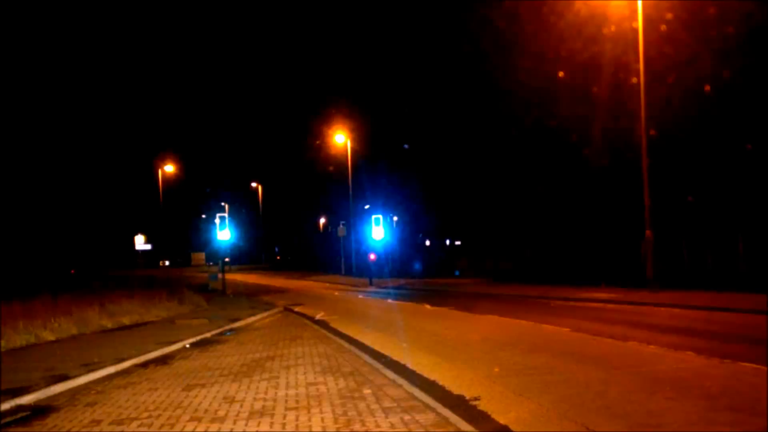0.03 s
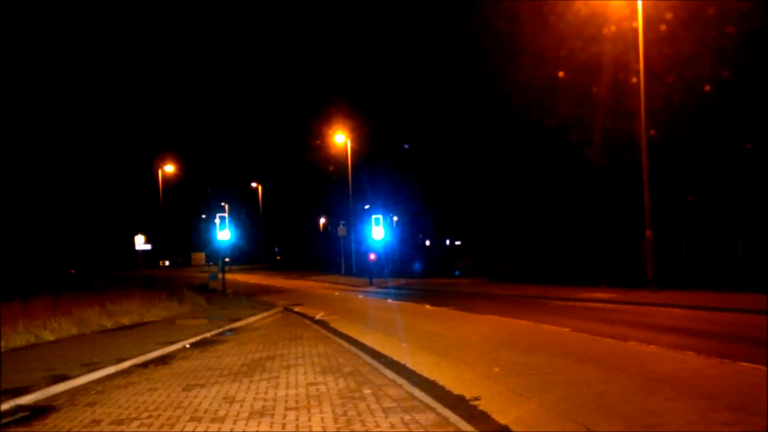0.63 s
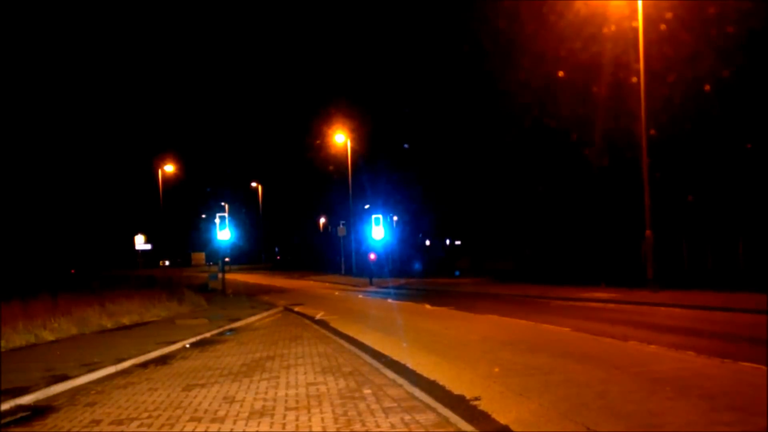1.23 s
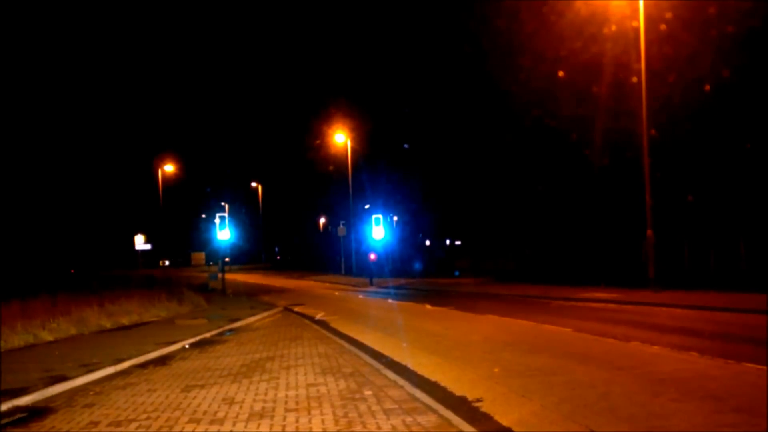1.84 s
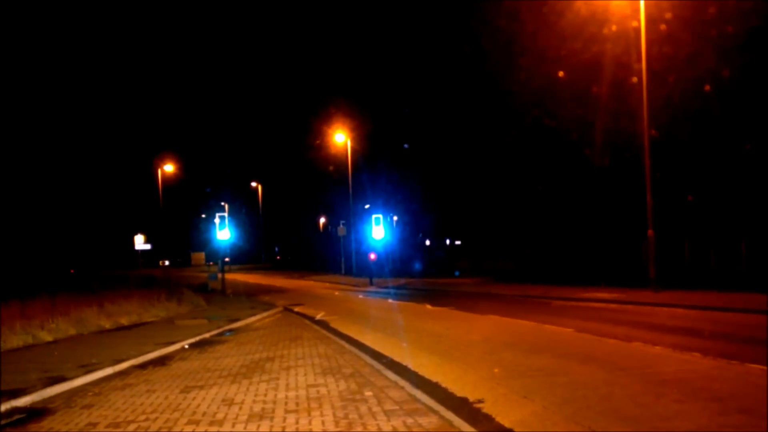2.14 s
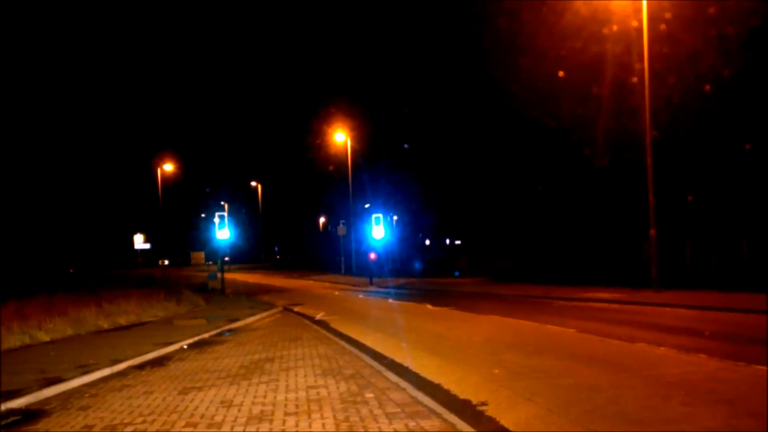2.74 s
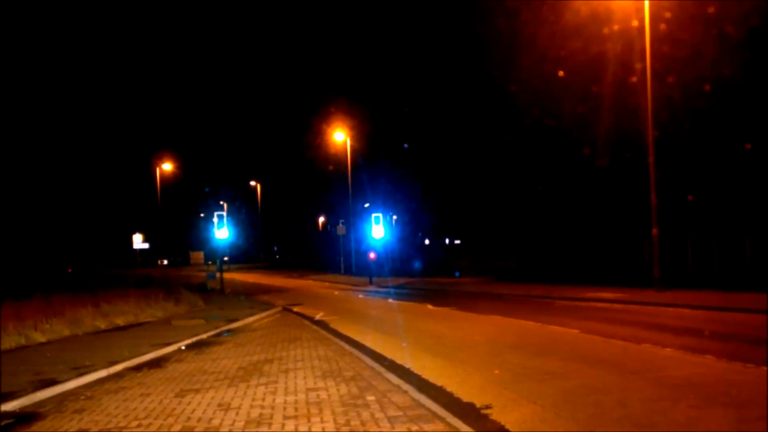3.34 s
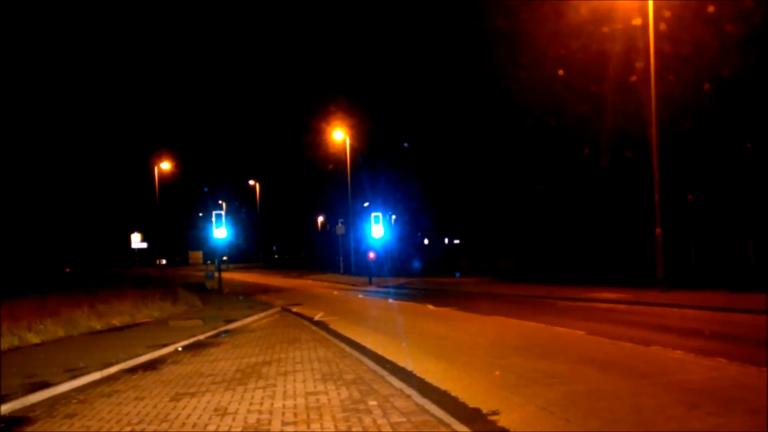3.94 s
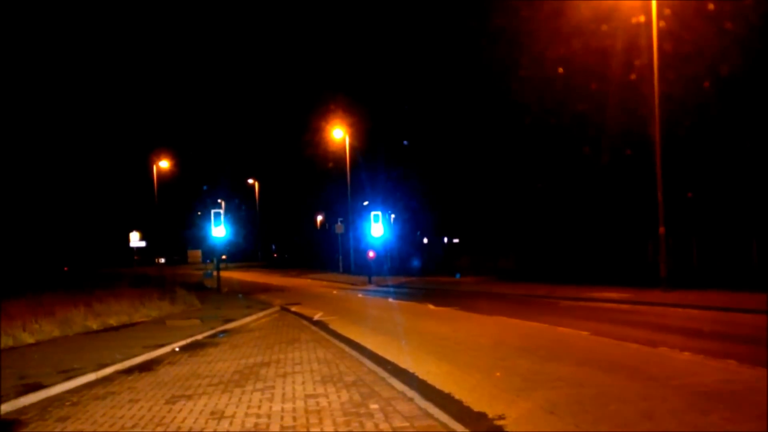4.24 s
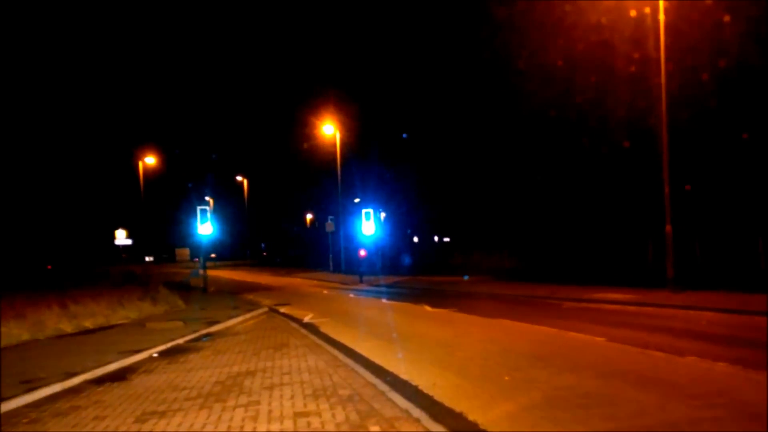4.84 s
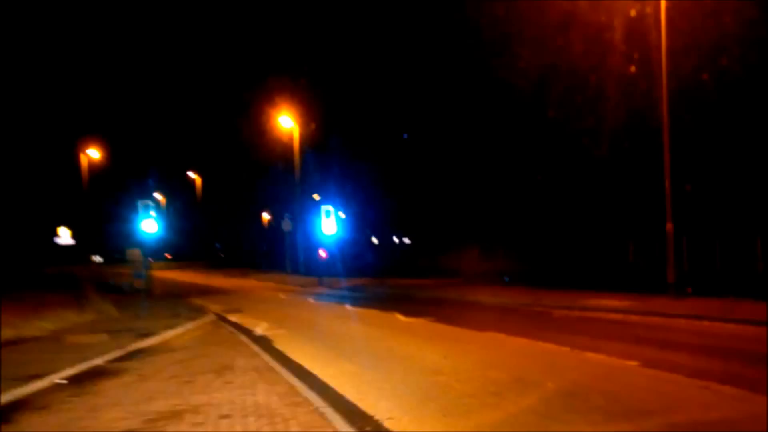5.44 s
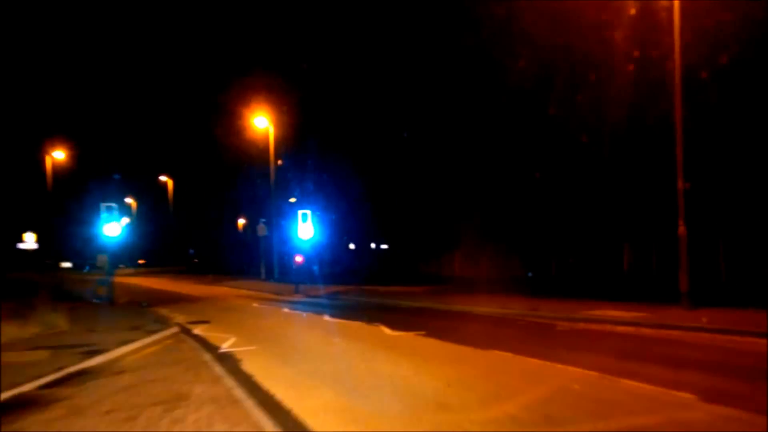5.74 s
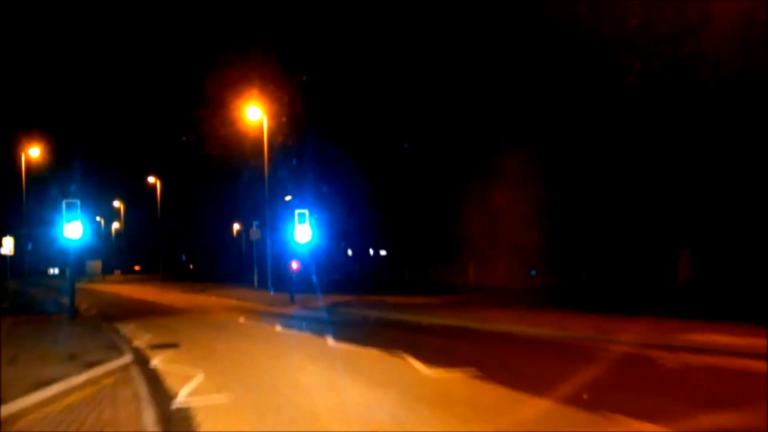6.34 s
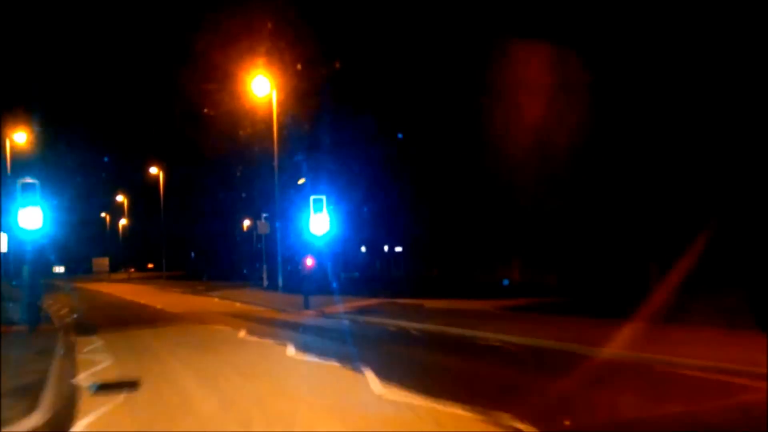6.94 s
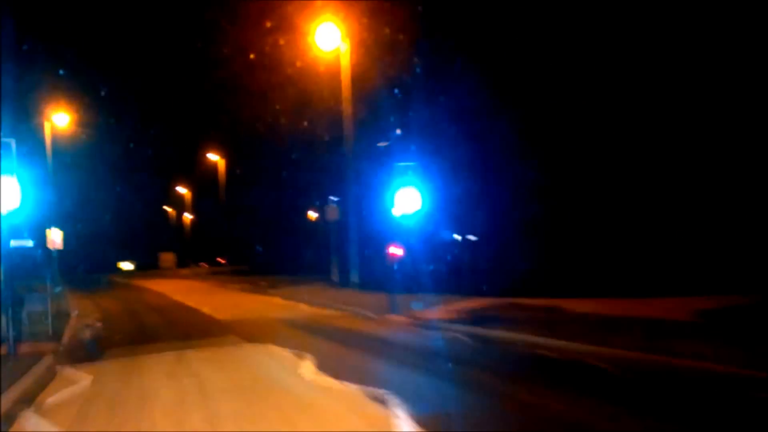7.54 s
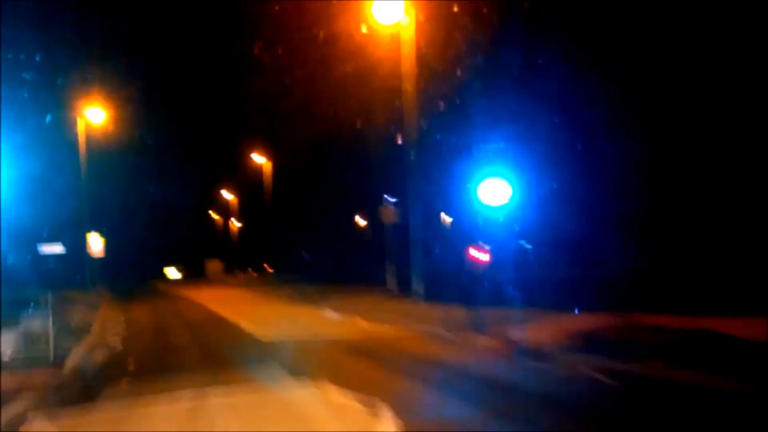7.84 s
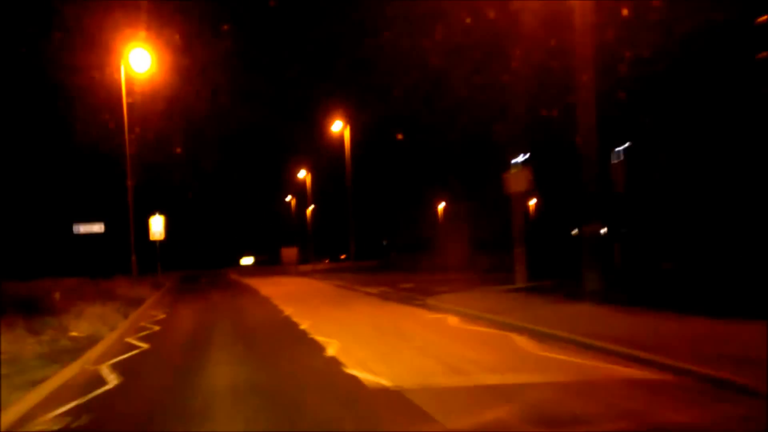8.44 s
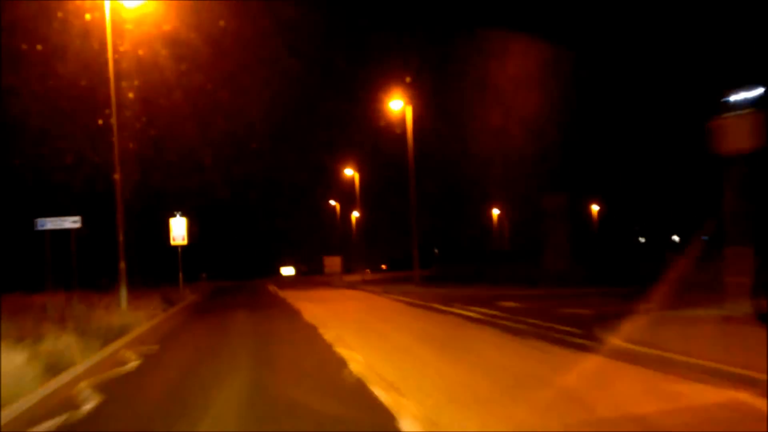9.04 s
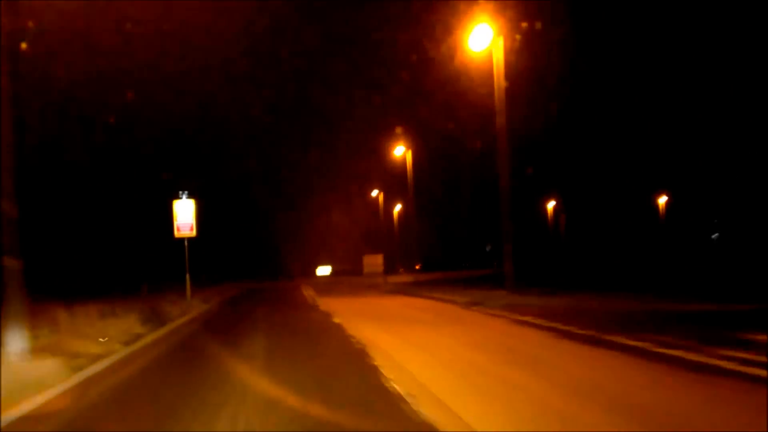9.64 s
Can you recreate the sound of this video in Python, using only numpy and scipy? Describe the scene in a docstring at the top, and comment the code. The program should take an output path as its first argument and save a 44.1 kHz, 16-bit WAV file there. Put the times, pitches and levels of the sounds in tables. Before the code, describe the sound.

A car at the roadside revs in quickening, rising bursts, its exhaust deep and uneven and its turbo valve letting out chirping puffs of air. The engine runs down, then accelerates through two gear changes, each marked by another hiss and chirp. Brief gear whines, a couple of light clunks and ticking grit join the growing rush of tyres and wind. The microphone travels with the car, outside it.

```python
"""A dull knock over faint rumble, then a turbocharged flat-four is blipped at the kerb and pulls away
through two gear changes, heard from outside the car. Uneven firings throb in the exhaust pipe;
after the harder blips and at each change, the blow-off valve dumps its air, often with a chirp.
Tyre and wind noise grow with road speed, and grit ticks against the body."""
import sys
import numpy as np
from scipy import signal
from scipy.fft import rfft, irfft
from scipy.io import wavfile
from scipy.ndimage import uniform_filter1d

SR = 44100
rng = np.random.default_rng(int(sys.argv[2]) if len(sys.argv) > 2 else 0)


def wrap_up_sound(samples):
    """Save the sound to the file named by the first command line argument, as 16-bit audio."""
    columns = np.atleast_2d(samples).T
    # keep every value between -1 and 1, then stretch to whole-number steps
    tamed = np.clip(columns, -1, 1)
    steps = np.round(tamed * 32767).astype(np.int16)
    wavfile.write(sys.argv[1], SR, steps)


N = 427329
TIME = np.arange(N) / SR
IDLE_CYCLES_PER_S, CRUISE_CYCLES_PER_S = 12, 25   # four-stroke cycles, four firings each


def from_db(db):
    """Decibels to gain."""
    return np.exp(np.asarray(db) * (np.log(10) / 20))


def unit_rms(x):
    """Scale to unit power."""
    return x / np.sqrt(np.mean(x ** 2) + 1e-20)


def in_time(rows):
    """Columns of a curve table at every sample."""
    t_s, *columns = np.transpose(rows)
    return [np.interp(TIME, t_s, column) for column in columns]


def drift(rate_hz):
    """Random wander, unit RMS."""
    knots = rng.standard_normal(int(rate_hz * N / SR) + 2)
    return unit_rms(np.interp(TIME * rate_hz, np.arange(len(knots)), knots))


def butter(x, hz, kind, order=4):
    """Butterworth filter."""
    return signal.sosfilt(signal.butter(order, hz, kind, fs=SR, output="sos"), x)


def response(spectrum, size=16384):
    """Frequencies and complex log gain of a minimum-phase filter."""
    hz, db = np.transpose(spectrum)
    bins_hz = np.maximum(np.arange(size // 2 + 1) * SR / size, 1)
    gain = from_db(np.interp(np.log(bins_hz), np.log(hz), db))
    cepstrum = irfft(np.log(gain))
    cepstrum[1:size // 2] *= 2
    cepstrum[size // 2 + 1:] = 0
    return bins_hz, rfft(cepstrum)


def colour(x, spectrum):
    """Causal filter with the given response."""
    bins_hz, log_gain = response(spectrum)
    impulse = irfft(np.exp(log_gain))[:len(bins_hz)]
    return signal.oaconvolve(x, impulse)[:N]


def noise(spectrum):
    """Coloured noise, unit RMS."""
    return unit_rms(colour(rng.standard_normal(N), spectrum))


def gliding_band(hz, width_hz):
    """Narrow noise band around a moving centre."""
    baseband = butter(rng.standard_normal(N) + 1j * rng.standard_normal(N), width_hz / 2, "low", order=2)
    return unit_rms(np.real(baseband * np.exp(2j * np.pi * np.cumsum(hz) / SR)))


def bodywork(x, echo=0.49, count=14):
    """Close reflections off panels and tarmac ripple the spectrum."""
    lags = (rng.uniform(.002, .022, count) * SR).astype(int)
    signs = rng.choice([-1, 1], count)
    echoes = sum(sign * np.pad(x, (lag, 0))[:N] for lag, sign in zip(lags, signs))
    return unit_rms(x + echo * echoes / np.sqrt(count))


def taps(events, spectrum, rise_s, decay_s):
    """Each contact is a noise burst in the colour of what is struck."""
    envelope = np.zeros(N)
    for t_s, db in events:
        near = slice(int((t_s - .1) * SR), int((t_s + .2) * SR))
        age_s = TIME[near] - t_s
        envelope[near] += from_db(db) * np.exp(np.minimum(age_s / rise_s, -age_s / decay_s))
    return envelope * noise(spectrum)


# background level: t/s, level/dB
BED_LEVEL = [(.2, -81), (.85, -66), (1.42, -59), (1.52, -51), (1.85, -61), (2.0, -53), (2.3, -56.5),
             (9.69, -49.5)]
# background spectrum: f/Hz, level/dB
BED_SPECTRUM = [(40, 1), (300, -2.5), (1500, -14.5), (9000, -25), (15500, -31.5)]
def bed():
    """Low rumble and thin hiss, swelling twice early on."""
    return from_db(in_time(BED_LEVEL)[0]) * noise(BED_SPECTRUM)


# whine level: t/s, level/dB
WHINE_LEVEL = [(.1, -100), (1.1, -68.5), (4.98, -72), (5.08, -85), (6.55, -81), (6.7, -67)]
def high_whine(hz=15000):
    """Faint 15 kHz whine, steady in pitch."""
    return from_db(in_time(WHINE_LEVEL)[0]) * np.sin(2 * np.pi * hz * TIME)


# body panel spectrum: f/Hz, level/dB
KNOCK_SPECTRUM = [(100, 0), (480, 9), (800, -6), (1500, -15), (10000, -35)]
def knock(t_s=.325, level_db=-45):
    """One dull knock on the body."""
    return taps([(t_s, level_db)], KNOCK_SPECTRUM, rise_s=0.0069, decay_s=0.013)


# grit hits: t/s, level/dB before trim
GRIT_HITS = [(0.4395, -44), (4.8498, -48), (5.5393, -49), (6.053, -51), (7.0864, -41), (7.104, -50),
             (7.117, -36.5), (7.388, -42), (8.3015, -34.5), (8.684, -39.5), (8.933, -38)]
# ring of a hit: f/Hz, level/dB
GRIT_SPECTRUM = [(500, -1), (1200, 0), (5200, 4.5), (7500, -3.5), (9700, -3), (14000, -37)]
def grit(trim_db=-4):
    """Grit and small rattles tick against the body."""
    return from_db(trim_db) * taps(GRIT_HITS, GRIT_SPECTRUM, rise_s=0.0019, decay_s=0.0093)


# loose-part hits: t/s, level/dB
CLUNK_HITS = [(4.854, -37), (6.6, -37)]
# their ring: f/Hz, level/dB
CLUNK_SPECTRUM = [(400, -22), (950, 4), (1250, 7), (1600, 5), (2400, -13), (8000, -36)]
def clunks():
    """Loose parts clunk as the car lurches."""
    return taps(CLUNK_HITS, CLUNK_SPECTRUM, rise_s=0.0039, decay_s=0.016)


# drivetrain tones: t/s, level/dB, f/Hz, swell/s
GEAR_TONES = [(6.07, -48.5, 1726, 0.081), (6.881, -46.5, 1365, 0.11), (7.722, -59, 1727, 0.43)]
def gears(rise_per_s=.2):
    """The drivetrain sings in brief, unsteady, rising whines."""
    out = np.zeros(N)
    for t_s, db, hz, swell_s in GEAR_TONES:
        pitch_hz = hz * (1 + rise_per_s * np.clip(TIME - t_s, -1, 1))
        phase = 2 * np.pi * np.cumsum(pitch_hz) / SR + 1.1 * drift(150)
        out += from_db(db) * np.exp(-((TIME - t_s) / swell_s) ** 2) * np.sin(phase)
    return out


# tyre, wind and engine-bay spectrum: f/Hz, level/dB
ROAD_SPECTRUM = [(200, 14), (700, 15), (1150, -2.5), (1700, -4), (2350, -10), (2850, -9.5), (3300, -11.5),
                 (4300, -14), (5400, -14), (6800, -22), (9000, -33.5), (15500, -53.5)]
def road(puffs, bay_db=-44.5, db_per_octave=18, load_db=3, fade_in_s=2.14, roll_s=2.44, tyres_db=-29.5):
    """Bay rush grows with revs and load, tyres and wind with speed; all pulse with the firings."""
    bay = from_db(bay_db + db_per_octave * rev_octaves() + load_db * throttle()[0])
    bay *= np.minimum(TIME / fade_in_s, 1) ** 2
    road_speed = np.maximum(TIME - roll_s, 0) / (TIME[-1] - roll_s)
    tyres = from_db(tyres_db) * road_speed ** 2.57
    rush = butter(noise(ROAD_SPECTRUM), 130, "high", order=2) * (1 + puffs)
    return np.hypot(bay, tyres) * bodywork(rush, echo=0.43)


# valve chirps: t/s, level/dB before envelope, settled f/Hz
VALVE_CHIRPS = [(3.45, -17.5, 6120), (3.779, -18, 6200), (6.27, -27.5, 5970), (7.935, -17, 6100)]
def chirps(rise_s=0.011, decay_s=0.015, glide_hz=420, glide_s=0.0168, waver_hz=70, overtone_db=-29):
    """As the valve cracks open, the jet locks into a tone that drops as the gap widens."""
    out = np.zeros(N)
    wander_hz = waver_hz * drift(500)
    for t_s, level_db, hz in VALVE_CHIRPS:
        age_s = np.maximum(TIME - t_s, 0)
        phase = 2 * np.pi * np.cumsum(hz + glide_hz * np.exp(-age_s / glide_s) + wander_hz) / SR
        envelope = (1 - np.exp(-(age_s / rise_s) ** 2)) * np.exp(-age_s / decay_s)
        overtones = np.sin(1.5 * phase) + np.sin(2 * phase) / 2
        out += 2 * from_db(level_db) * envelope * (np.sin(phase) + from_db(overtone_db) * overtones)
    flutter = from_db(3.5 * drift(150))
    return out * flutter


# valve openings: t/s, shut/s, hiss/dB, hold/s, hiss fall/(dB/s), whistle/dB, whistle sink/(Hz/s)
VALVE_OPENINGS = [(2.743, 3.0, -56, 0.075, 68, -79, -0.5), (3.11, 3.42, -45.5, 0.11, 65, -67, -500),
                  (3.442, 3.665, -35.5, 0.1, 50, -42, 499.5), (3.762, 4.706, -34.5, 0.04, 22, -35.5, -100),
                  (6.279, 6.657, -37.5, 0.21, 50, -43, 1598), (7.925, 8.265, -35, 0.24, 90, -33.5, 899)]
def valve_flow(open_s=0.047, close_s=0.029, whistle_hold_s=0.073, whistle_db_per_s=172, linger_db=-10):
    """Hiss and whistle gains: each opening rises, holds, and ebbs with the boost until shut."""
    hiss, whistle = np.zeros(N), np.zeros(N)
    for t_s, shut_s, hiss_db, hold_s, fall_db_per_s, whistle_db, _ in VALVE_OPENINGS:
        age_s = np.maximum(TIME - t_s, 0)
        gap = np.minimum(age_s / open_s, 1) * np.exp(np.minimum(shut_s - TIME, 0) / close_s)
        hiss += gap * from_db(hiss_db - fall_db_per_s * np.maximum(age_s - hold_s, 0))
        whistle += gap * from_db(whistle_db - whistle_db_per_s * np.maximum(age_s - whistle_hold_s, 0))
    return hiss, whistle + from_db(linger_db) * hiss


def last_opening():
    """Time since the valve last opened, and the sink rate of its whistle."""
    opened_s, *_, sink_hz_per_s = np.transpose(VALVE_OPENINGS)
    last = np.maximum(np.searchsorted(opened_s, TIME) - 1, 0)
    return np.abs(TIME - opened_s[last]), sink_hz_per_s[last]


def swoosh(age_s, from_hz=6000, to_hz=2780, fall_s=.2):
    """A noise band starts high at each opening and sinks with the pressure."""
    centre_hz = to_hz + (from_hz - to_hz) * np.exp(-(age_s / fall_s) ** 2)
    return gliding_band(centre_hz, width_hz=700)


# escaping-air spectrum: f/Hz, level/dB
HISS_SPECTRUM = [(650, -3.5), (1100, -7), (2100, 4), (2400, -1), (2850, 4.5), (4400, 2), (5900, 3.5),
                 (6900, -9.5), (8800, -15), (10000, -17), (11000, -24.5), (15500, -25.5)]
def blow_off(puffs, whistle_hz=6350, throat_hz=(2670, 3090), throat_db=-27, swoosh_db=-11.5,
             surge_db=1.44, flutter_db=1.0, throb=0.038):
    """Escaping air hisses and surges, ringing the valve's throat and its narrow mouth."""
    hiss_gain, whistle_gain = valve_flow()
    age_s, sink_hz_per_s = last_opening()
    mouth = gliding_band(whistle_hz - sink_hz_per_s * age_s, width_hz=320)
    throat = bodywork(butter(rng.standard_normal(N), throat_hz, "band", order=2), echo=0.83)
    air = hiss_gain * bodywork(noise(HISS_SPECTRUM)) * from_db(surge_db * drift(15))
    air += whistle_gain * mouth * from_db(2 * surge_db * drift(40))
    air += from_db(throat_db + surge_db * drift(16)) * hiss_gain ** 0.52 * throat   # outlasts the hiss
    air += from_db(swoosh_db) * hiss_gain * swoosh(age_s)
    return air * from_db(flutter_db * drift(60)) * unit_rms(1 + throb * puffs)


# throttle blips: down/s, up/s, revs reached/(cycles/s), boom gain/dB, bark gain/dB
THROTTLE_BLIPS = [(0.899, 1.402, 21, 6.5, 5), (1.599, 1.901, 23.2, 6.5, -4), (2.127, 2.393, 25.6, 4, 5),
                  (2.589, 2.79, 32.8, 7, 9), (2.95, 3.121, 40, 8, 12), (3.28, 3.449, 46.8, 6, 6),
                  (3.651, 3.789, 50.4, 7.5, 6.5)]
# run-down after the last blip: t/s, revs/(cycles/s)
RUN_DOWN_REVS = [(4.28, 38.2), (4.42, 37.6), (4.72, 34.2), (4.85, 30.1), (4.97, 24.7), (5.24, 17.9),
                 (5.5, 16.6)]
# driving, with a drop at each gear change: t/s, revs/(cycles/s)
DRIVE_REVS = [(5.68, 20.9), (5.85, 21.4), (6, 25.6), (6.15, 26.7), (6.28, 29.5), (6.68, 25.5), (6.8, 25.7),
              (7.02, 20.2), (7.12, 22.4), (7.25, 22.9), (7.83, 28.9), (7.97, 29.4), (8.08, 30.9),
              (8.22, 29.7), (8.31, 30.1), (8.5, 21), (8.6, 22), (8.75, 22.9), (9.69, 28.5)]
def crank_speed(sag_cycles_per_s2=10):
    """Cycles per s: blips lift the revs, which sag in between, then run down before the drive."""
    points = [(THROTTLE_BLIPS[0][0], IDLE_CYCLES_PER_S)]
    for down_s, up_s, reached, _, _ in THROTTLE_BLIPS:
        last_s, speed = points[-1]
        points += [(down_s, speed - sag_cycles_per_s2 * (down_s - last_s)), (up_s, reached)]
    return uniform_filter1d(in_time(points + RUN_DOWN_REVS + DRIVE_REVS)[0], size=2200)


def crank_cycles():
    """Four-stroke cycles turned so far."""
    return np.cumsum(crank_speed()) / SR


def rev_octaves():
    """Revs in octaves above cruising."""
    return np.log2(crank_speed() / CRUISE_CYCLES_PER_S)


def pedal(down_s, up_s, rise_s=0.077, fall_s=0.077, lag_s=0.033):
    """One push, 0-1: attack, hold, release."""
    return np.clip(np.minimum((TIME - down_s) / rise_s, (up_s + lag_s - TIME) / fall_s), 0, 1)


# pedal pushes in gear: down/s, up/s, boom gain/dB, bark gain/dB
GEAR_PULLS = [(5.591, 6.3, 4, -1), (6.719, 8.04, 2.5, 4), (8.228, 9.9, 5, 1)]
def throttle():
    """Load 0-1, and the dB it adds to boom and bark."""
    pushes = [pedal(*blip[:2], rise_s=0.16) for blip in THROTTLE_BLIPS]
    pushes += [pedal(*pull[:2]) for pull in GEAR_PULLS]
    weights = [(1, boom_db, bark_db) for *_, boom_db, bark_db in THROTTLE_BLIPS + GEAR_PULLS]
    return np.transpose(weights) @ np.array(pushes)


def load_shares():
    """Shares of blipping, light throttle, pulling in gear and overrun."""
    blipped = sum(pedal(*blip[:2]) for blip in THROTTLE_BLIPS)
    light = pedal(down_s=4.26, up_s=5.63)
    pulling = sum(pedal(*pull[:2]) for pull in GEAR_PULLS)
    return np.array([blipped, light, pulling, 1 - blipped - light - pulling])


def scatter_db(cruise_db=2.5, load_db=0.9):
    """Spread of the firings: lumpy at low revs, a little rougher under load."""
    return cruise_db * 2 ** (-0.68 * rev_octaves()) + load_db * throttle()[0]


def firings(weak_bank_db=3, header_lag_s=0.0011, pair_lag_s=0.00012, jitter_s_per_db=.00007):
    """Two pulses from each bank in turn; the far bank arrives late and weaker, making the burble."""
    count = 4 * crank_cycles()
    number = np.arange(1, int(count[-1]))
    fired = np.searchsorted(count, number)
    far_bank, second = number % 4 // 2, number % 2
    spread_db = scatter_db()[fired]
    level_draw, time_draw = rng.standard_normal((len(fired), 2)).T
    level_db = -far_bank * weak_bank_db + spread_db * level_draw + 0.2 * second
    late_s = far_bank * header_lag_s + second * pair_lag_s + jitter_s_per_db * spread_db * time_draw
    arrived = np.clip(fired + (late_s * SR).astype(int), 0, N - 1)
    return np.bincount(arrived, from_db(level_db), N)


# rasp spectrum: f/Hz, level/dB
RASP_SPECTRUM = [(500, -20), (950, 7.5), (1500, -3), (2300, -23.5), (3500, -25.5), (5200, -12.5),
                 (7000, -35.5)]
def tailpipe_rasp(puffs, bark_db, rasp_db=-37, at_bark_db=-14.5, start_s=3.9, fade_in_s=0.35, throb=0.97):
    """From the run-down on, puffs rasp at the pipe's mouth as the bark grows."""
    fade_in = np.clip((TIME - start_s) / fade_in_s, 0, 1)
    level_db = rasp_db + 2 * (bark_db - at_bark_db)
    return fade_in * from_db(level_db) * unit_rms(noise(RASP_SPECTRUM) * (1 + throb * puffs))


# pipe and silencer response: f/Hz, level/dB
PIPE_RESPONSE = [(55.0, -35.5), (80.0, -27.5), (100.0, -17.5), (120.0, -7.5), (145.0, -7), (163.0, -4.5),
                 (182.0, 2.5), (205.0, -7.5), (240.0, -3), (280.0, -15), (328.0, -10), (365.0, -16.5),
                 (430.0, -18.5), (550.0, -25.5), (635.0, -22), (720.0, -33), (830.0, -35.5), (1100.0, -51),
                 (1800.0, -57)]
# lower harmonics by load: harmonic, blipped/dB, light/dB, pulling/dB, overrun/dB
HARMONIC_LEVELS = [(3.0, -8, -12, -12.5, 10), (4.0, 9.5, 0.5, 7, 12), (5.0, 9, 8.5, 3, 7.5),
                   (6.0, -5, -9, -13, -0.5), (7.0, 7.5, 2, 3.5, 7.5), (8.0, 8, 5.5, 12, 5.5),
                   (9.0, 0, -1.5, 1, 0.0), (10.0, -12, -3, 4, -4), (11.0, 5, -6, 2.0, 0.5),
                   (12.0, 1.5, 8.5, 6.0, 1.0), (13.0, 2, 2.5, -3, 0.5), (14.0, -2.5, -9, -1, -5.5),
                   (15.0, 3, -6, -0.5, -6), (16.0, 5.5, 7, 3.5, 2)]
def growl(boom_db, bark_db, boom_hz=200, bark_hz=500, waver_db=2.15, wobble_cycles=.002, step=10):
    """Cycle harmonics sweep through the pipe's resonances; the low ones throb loosely in step."""
    cycles = crank_cycles() + wobble_cycles * drift(25)
    controls = crank_speed(), cycles, boom_db, bark_db, load_shares()
    speed, cycles, boom_db, bark_db, shares = (control[..., ::step] for control in controls)
    pipe_hz, pipe_log_gain = response(PIPE_RESPONSE)
    burble_db = 0.58 * (CRUISE_CYCLES_PER_S / speed) ** 2 * drift(22)[::step]
    out = 0
    for row, harmonic in enumerate(range(3, 49)):
        hz = harmonic * speed
        bark_share = np.clip(np.log(hz / boom_hz) / np.log(bark_hz / boom_hz), 0, 1)
        db = (1 - bark_share) * boom_db + bark_share * bark_db
        db += burble_db + waver_db * drift(14)[::step]
        if row < len(HARMONIC_LEVELS):
            db += np.array(HARMONIC_LEVELS[row][1:]) @ shares
            offset_turns = .24 * rng.standard_normal()
        else:   # upper harmonics: out of step, standing out at random
            db += 0.5 + 3.5 * drift(2.5)[::step]
            offset_turns = rng.random()
        phase = 2 * np.pi * (harmonic * cycles + offset_turns)
        through_pipe = np.exp(np.interp(hz, pipe_hz, pipe_log_gain) + 1j * phase)
        out += np.sqrt(2) * from_db(db) * through_pipe.real
    return signal.resample_poly(out, step, 1, window=("kaiser", 10))[:N]


def roughness(pulses, puffs, boom_db, bark_db, silencer_hz=2000):
    """Each firing strays from the mean and leaves turbulent gas; both ring the pipe."""
    stray = unit_rms(pulses * rng.standard_normal(N))
    turbulence = unit_rms(np.sqrt(np.abs(puffs)) * rng.standard_normal(N))
    drive = unit_rms((stray + turbulence) * scatter_db())
    pipe = colour(drive, PIPE_RESPONSE) * np.sqrt(SR / 2 / CRUISE_CYCLES_PER_S)
    pipe = butter(pipe, silencer_hz, "low", order=2)
    boom = from_db(boom_db - 11.5) * butter(pipe, 300, "low")
    bark = from_db(bark_db - 8) * butter(pipe, 303, "high")
    return boom + bark


# low (boom) and high (bark) harmonics into the pipe, throttle shut: t/s, boom/dB, bark/dB
EXHAUST_LEVELS = [(0.85, -67.5, -71), (1.0, -47.5, -63), (1.5, -41, -41), (1.85, -38.5, -38),
                  (2.05, -35, -35.5), (2.5, -32, -34), (2.9, -30.5, -22.5), (3.22, -28.5, -19),
                  (3.55, -24.5, -21), (3.9, -27, -16), (4.25, -27, -22), (4.55, -22.5, -20.5),
                  (4.85, -25, -25.5), (5.1, -26, -37), (5.4, -25, -32), (5.7, -31, -26.5), (6.2, -28, -19),
                  (6.42, -33, -25), (6.65, -32.5, -30), (6.85, -29.5, -26.5), (7.1, -32.5, -32),
                  (7.45, -29.5, -25), (7.9, -27, -20), (8.1, -36, -23), (8.21, -35.5, -22),
                  (8.29, -32.5, -22), (8.6, -37, -27), (9.05, -34, -18), (9.69, -29, -15)]
def exhaust(pulses, puffs, start_s=.25, fade_in_s=0.52):
    """Firings growl and rumble in the pipe and rasp at its mouth."""
    boom_db, bark_db = np.array(in_time(EXHAUST_LEVELS)) + throttle()[1:]
    fade_in = np.clip((TIME - start_s) / fade_in_s, 0, 1)
    pipe = growl(boom_db, bark_db) + roughness(pulses, puffs, boom_db, bark_db)
    return fade_in * pipe + tailpipe_rasp(puffs, bark_db)


def scene(puff_decay_s=0.01):
    """Mono mix, heard from a point moving with the car."""
    pulses = firings()
    puffs = unit_rms(signal.lfilter([1], [1, -np.exp(-1 / (puff_decay_s * SR))], pulses + 1e-18))
    background = grit() + knock() + clunks() + bed() + high_whine()
    car = exhaust(pulses, puffs) + blow_off(puffs) + chirps() + gears() + road(puffs)
    return (background + car)[None]


def record(dry):
    """Steep low-pass at 15750 Hz."""
    return signal.sosfilt(signal.ellip(12, .1, 80, 15750, fs=SR, output="sos"), dry)


dry = scene()
out = record(dry)
wrap_up_sound(out)
```